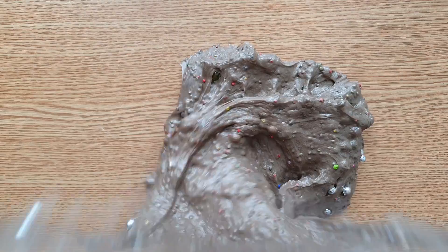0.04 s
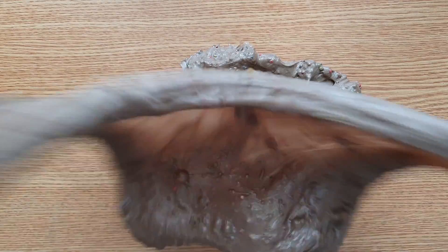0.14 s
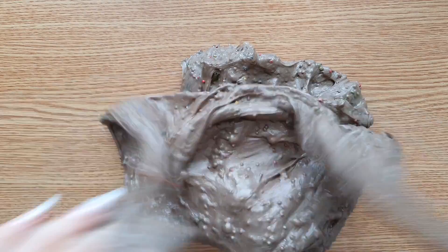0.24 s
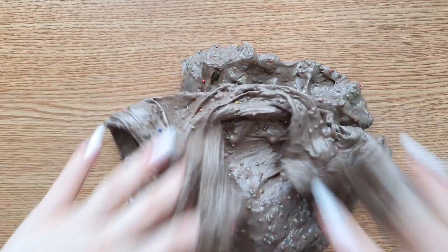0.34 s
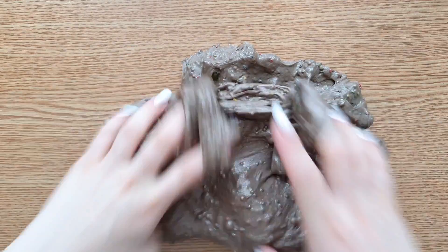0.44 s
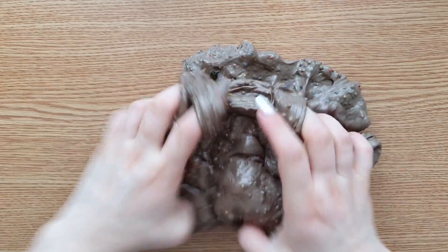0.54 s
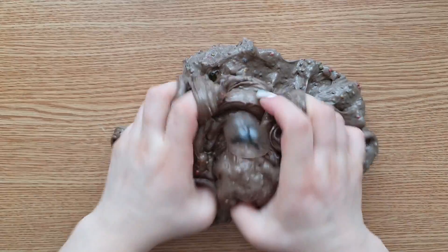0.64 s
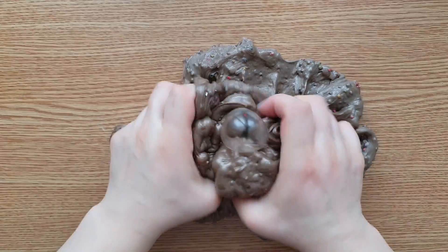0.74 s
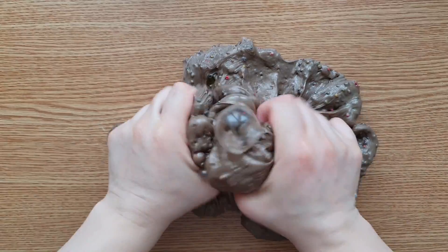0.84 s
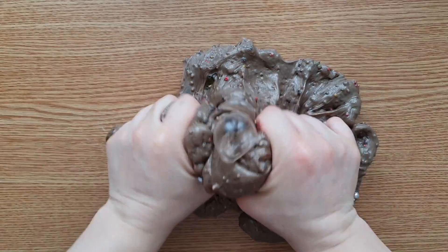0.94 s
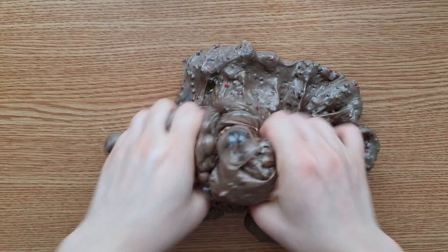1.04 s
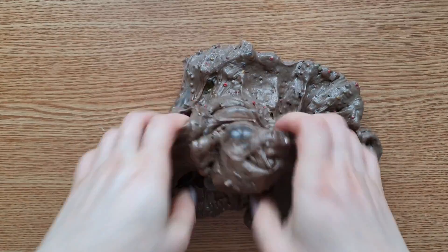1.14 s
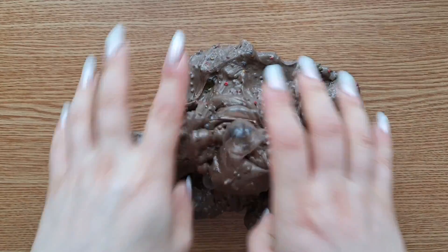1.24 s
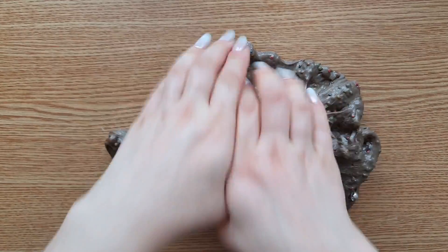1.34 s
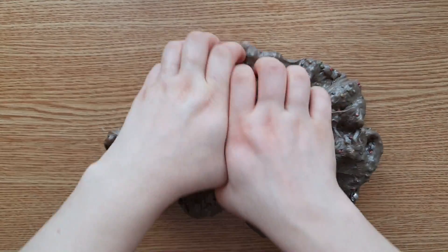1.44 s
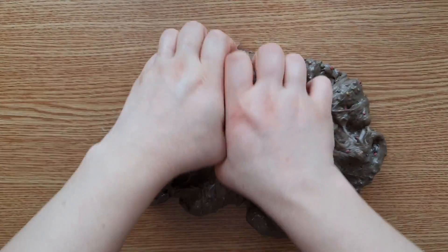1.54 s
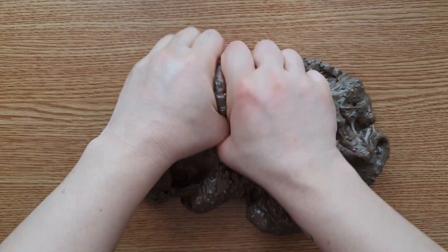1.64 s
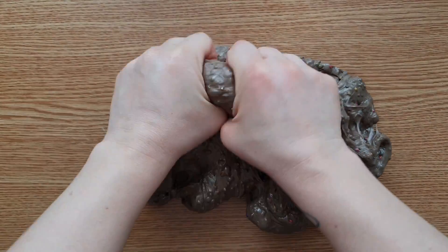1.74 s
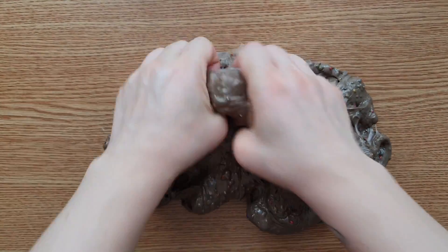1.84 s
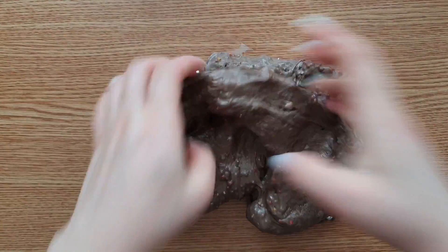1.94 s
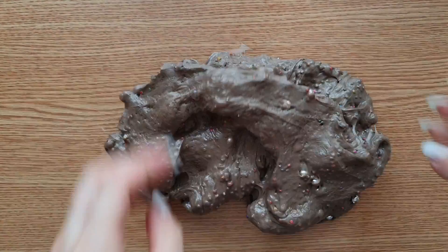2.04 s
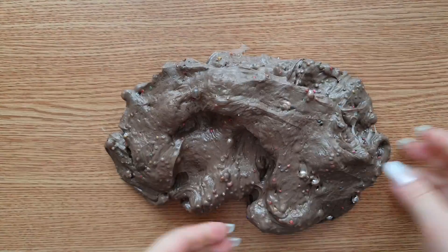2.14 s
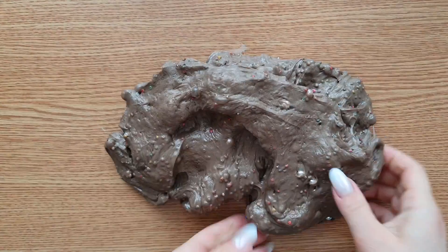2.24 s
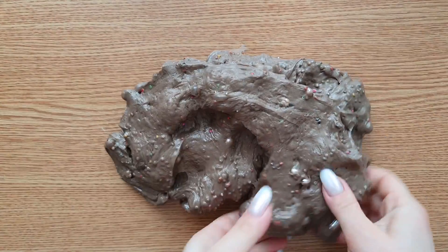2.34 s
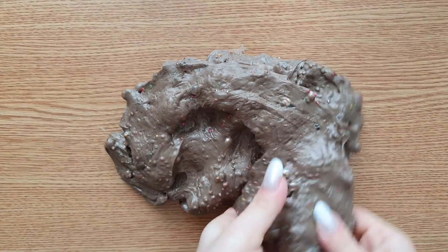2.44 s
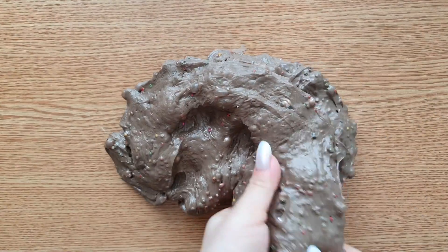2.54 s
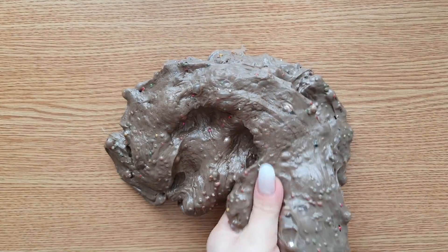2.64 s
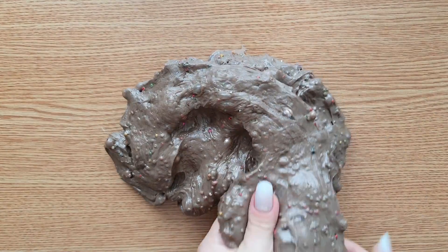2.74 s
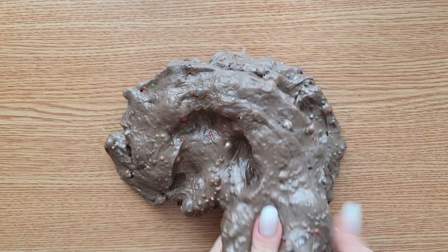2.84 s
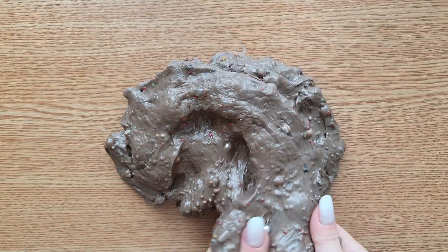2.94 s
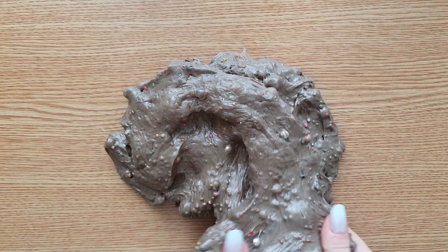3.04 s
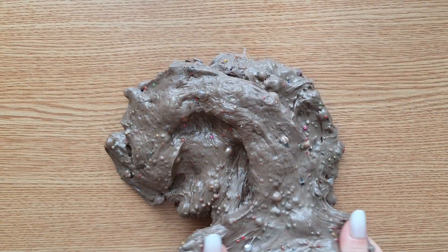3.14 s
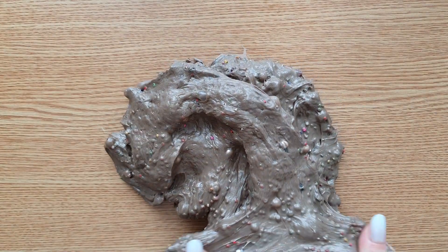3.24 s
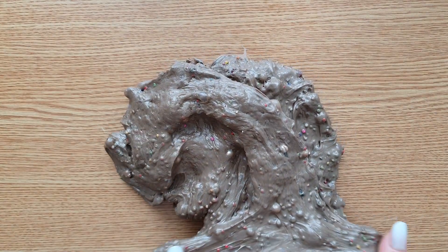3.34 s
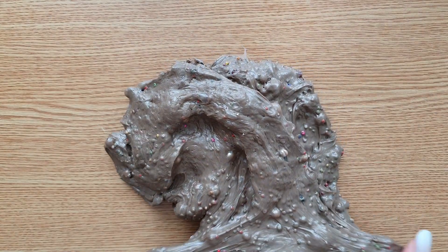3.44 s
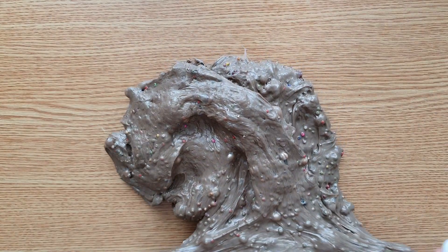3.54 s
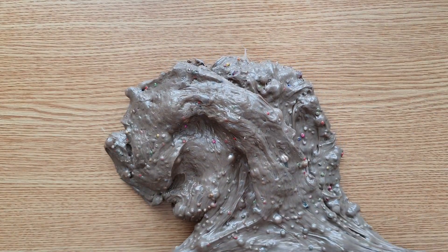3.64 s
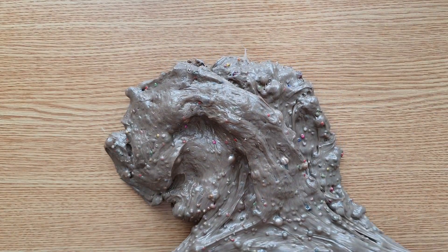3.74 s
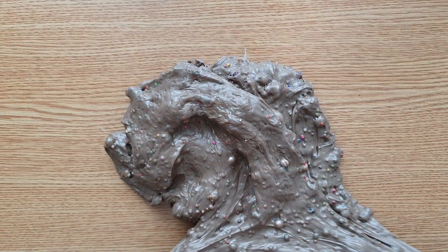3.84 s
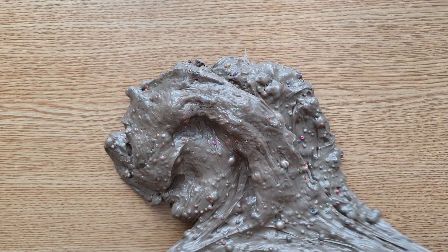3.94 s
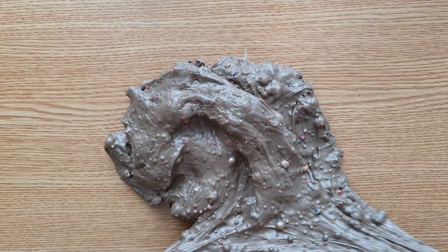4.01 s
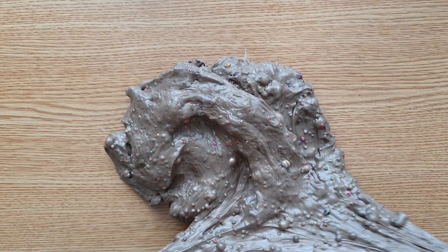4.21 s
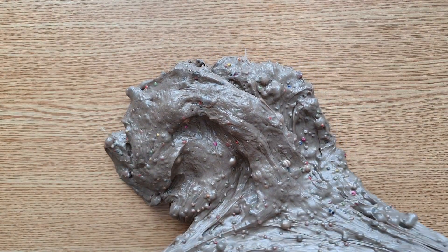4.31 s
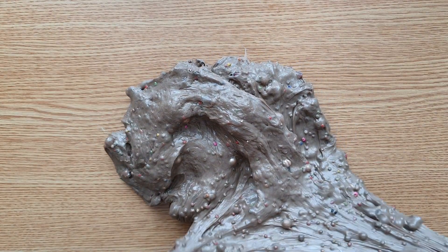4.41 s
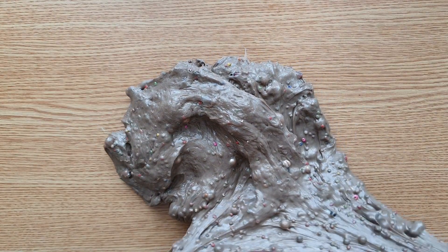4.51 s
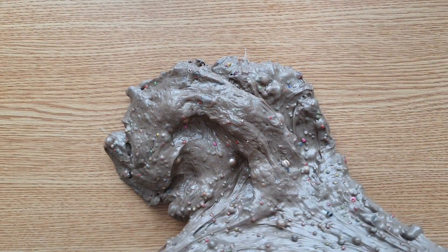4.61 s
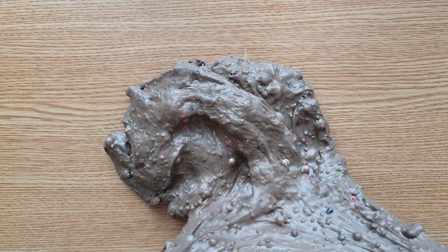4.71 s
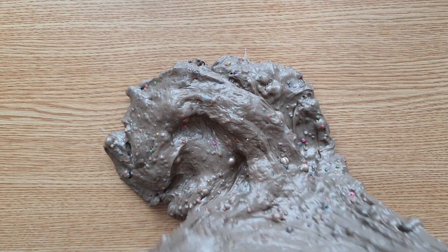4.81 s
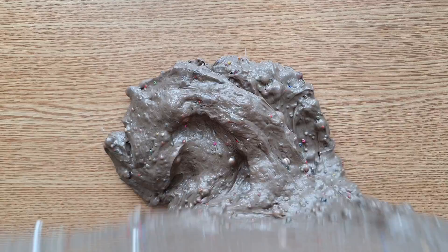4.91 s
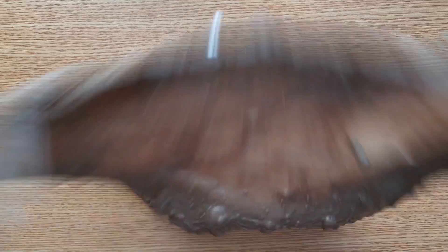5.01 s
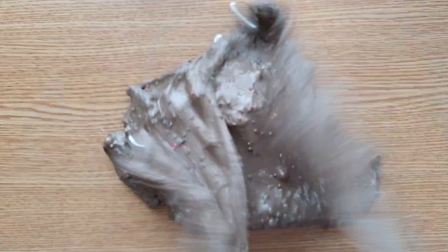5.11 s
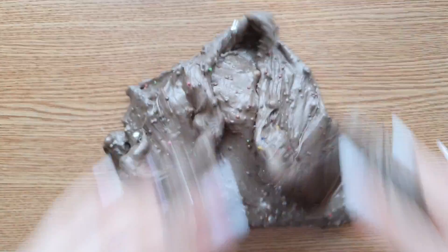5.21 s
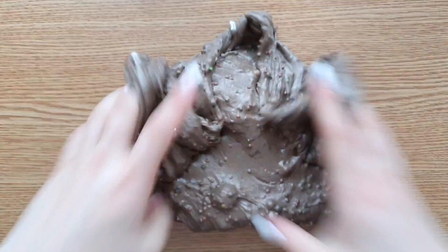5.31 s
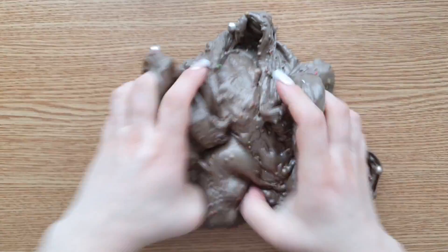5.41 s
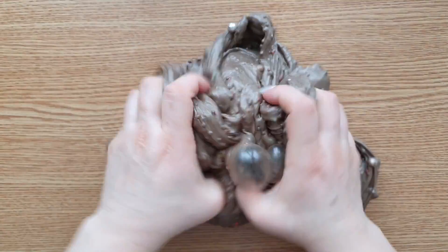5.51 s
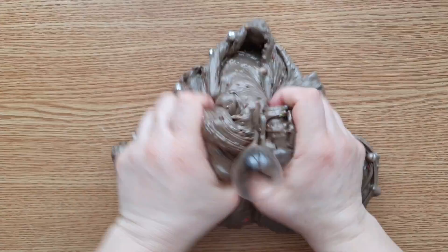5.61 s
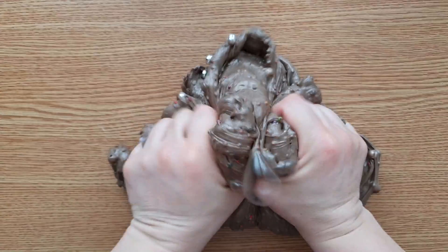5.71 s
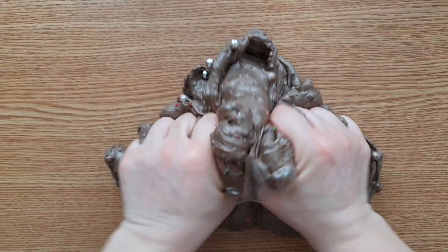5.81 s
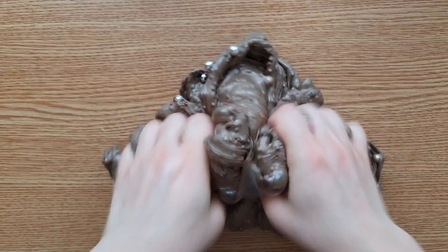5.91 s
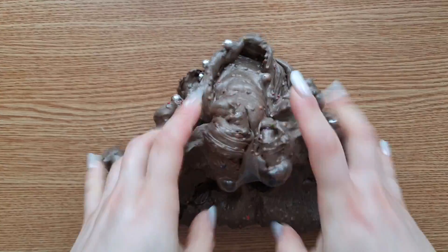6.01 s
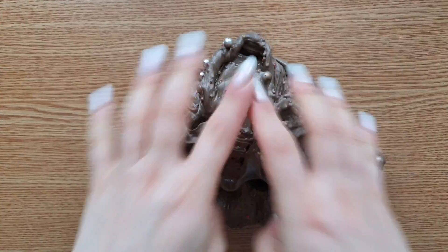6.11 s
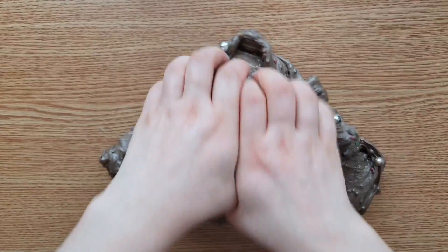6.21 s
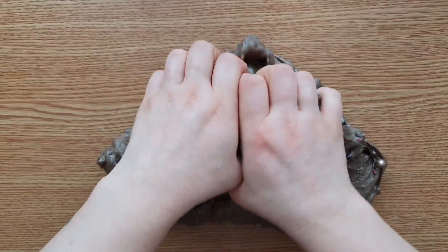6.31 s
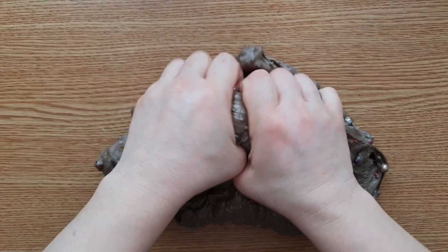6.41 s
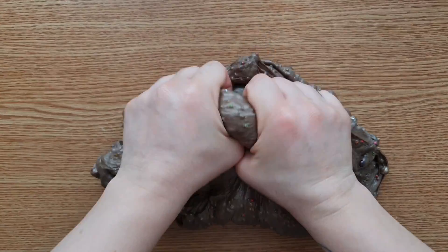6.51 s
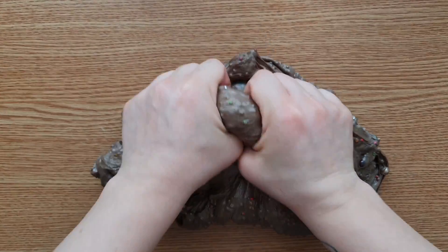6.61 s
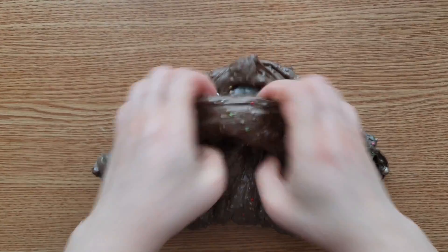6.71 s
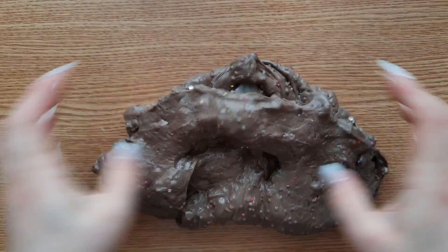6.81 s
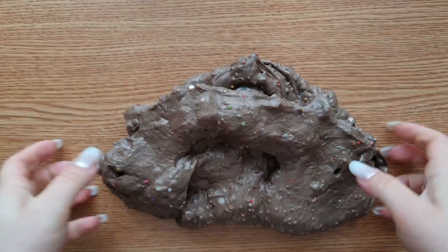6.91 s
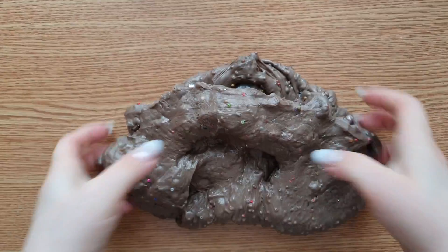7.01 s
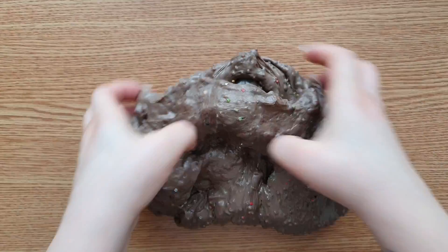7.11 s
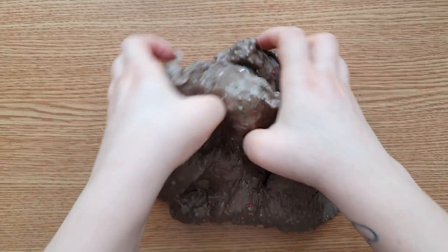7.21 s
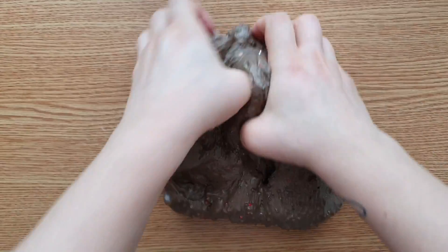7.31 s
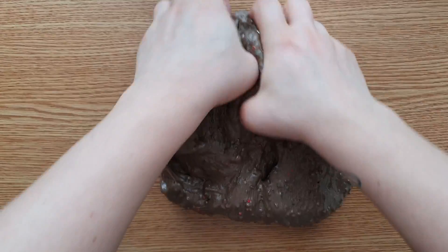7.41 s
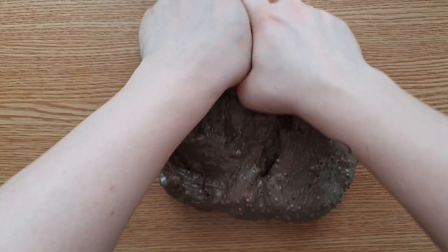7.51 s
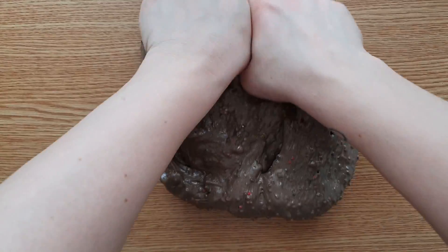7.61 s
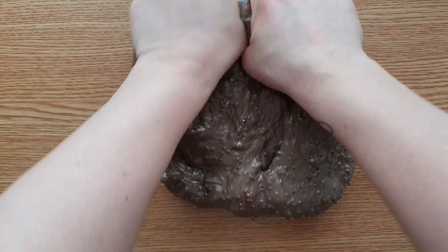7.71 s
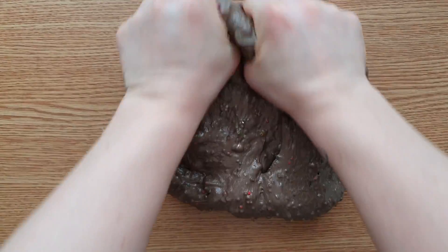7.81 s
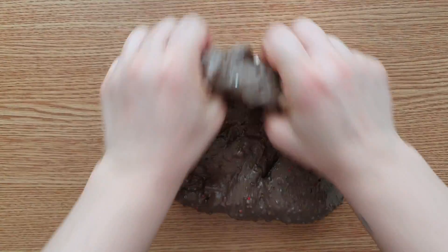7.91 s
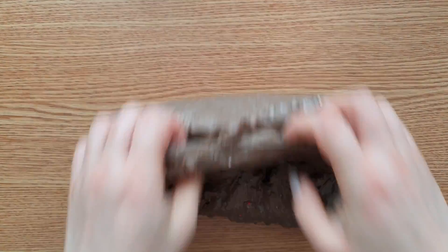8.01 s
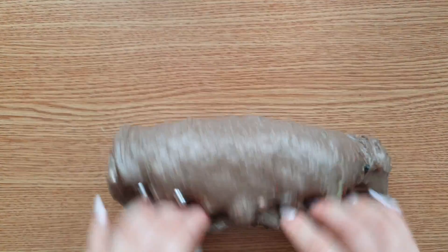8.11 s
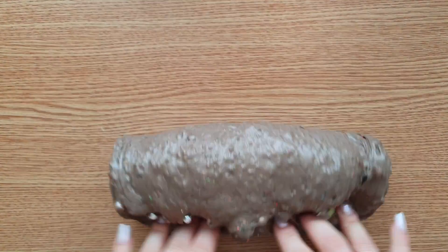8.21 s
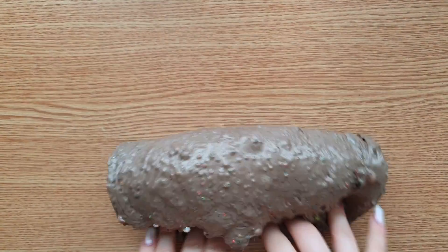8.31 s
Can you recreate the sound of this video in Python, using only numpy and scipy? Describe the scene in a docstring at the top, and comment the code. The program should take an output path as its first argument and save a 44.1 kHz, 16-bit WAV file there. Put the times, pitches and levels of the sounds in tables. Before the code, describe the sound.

Sticky slime is gripped and pressed in quick bursts, its trapped air snapping in dry, bright clicks and wetter pops among squelch and tearing crackle. A quiet pause leaves only faint ticks, hum and room hiss; a low distant motor drone joins midway. Then comes one hard splat and busier kneading to the end. Close stereo microphone, short bright room reflections.

```python
"""Bead-filled slime is slapped, squeezed and peeled by hand on a wooden table in a bare room.
Trapped air pockets burst: a brief sine for the air, noise bursts for the torn skin's splash and spit.
Tearing film, wet squelch and faint ticks are random clicks ringing in hollows; slaps are short noise bursts.
The table top thumps in its modes; echoes and a banded noise tail make the room.
Steady hum and faint whine, a distant motor that sets in midway and room noise lie below."""
import sys
import numpy as np
from scipy import signal
from scipy.fft import rfft, irfft, next_fast_len
from scipy.io import wavfile
from scipy.ndimage import uniform_filter1d

SR = 44100
rng = np.random.default_rng(int(sys.argv[2]) if len(sys.argv) > 2 else 0)


def bounce(signal):
    """Save signal as a 16-bit WAV file at the path given by the first command-line argument."""
    frames = np.transpose(np.atleast_2d(signal))
    limited = np.clip(frames, -1, 1)
    pcm = np.round(limited * 32767).astype(np.int16)
    wavfile.write(sys.argv[1], SR, pcm)


N = 368235

# steady hum and faint whine lines (frequency [Hz], level [dB rms])
HUM_LINES = [(100, -57), (200, -87.5), (300, -81), (689, -82), (996, -80.5), (1270, -79.5)]
# motor drone over time (time [s], level [dB rms])
MOTOR_LEVEL = [(4.36, -65), (4.6, -57), (5.1, -61.5), (6.3, -65), (6.8, -54.5), (7.7, -66), (8.35, -66)]
# room noise spectrum (frequency [Hz], relative density [dB])
ROOM_NOISE_SPECTRUM = [(30, 5.5), (70, -9), (140, 3), (245, -12), (330, -11), (420, -4.5), (600, 8.5),
                       (800, -2), (1350, 4), (2200, -7), (5300, -11.5), (12000, -16), (16000, -23)]
# diffuse sound (frequency [Hz], left-right correlation [0-1])
LIKENESS = [(60, .9), (130, 0.94), (290, 1), (1400, 0.3), (3100, 0.14), (6800, 0.01)]
# table top modes (frequency [Hz], level [dB], t60 [s])
TABLE_MODES = [(44, -11.5, 0.84), (70, -2, 0.75), (124, 4, 0.25), (210, -4.5, 0.27), (261.5, -2, .3),
               (530, -14.5, .15)]
# room decay (frequency [Hz], t60 [s])
ROOM_T60 = [(200, 0.064), (530, 0.15), (1400, 0.4), (3700, 0.35), (9700, 0.45), (15000, 0.24)]
# diffuse tail (frequency [Hz], reflected against direct energy [dB])
ROOM_TAIL = [(200, -4.5), (1000, -5), (3500, -5.5), (8000, -8), (15000, -13)]
# nearby surfaces (delay [ms], level [dB])
ECHOES = [(1.1, -26), (2.6, -33), (4.1, -13.5), (7.6, -15.5), (11.5, -17)]
# grips, squeezes and peels (start [s], hold [s], tearing film [dB], squelch [dB], push on the table [dB])
GRIPS = [(0.181, 0.085, -42, -78, -75), (0.453, 0.13, -64, -68, -66), (0.6, 0.25, -48, -64, -59.5),
         (0.864, 0.092, -48.5, -58, -70), (1.034, .12, -43.5, -49, -50), (1.433, 0.078, -59, -48.5, -64),
         (1.571, .14, -36, -50, -72), (1.811, 0.12, -47, -54, -59), (2.172, 0.083, -48.5, -61, -58),
         (2.334, 0.16, -54.5, -57, -66), (2.513, 0.33, -63.5, -75, -75), (4.373, .24, -64, -76, -69),
         (4.696, 0.086, -68.5, -74, -71), (4.92, 0.068, -67, -71, -68), (5.101, 0.14, -42.5, -59, -48),
         (5.334, 0.057, -60, -47.5, -50), (5.452, 0.29, -49, -60, -57), (5.683, 0.11, -48.5, -45, -53),
         (5.871, 0.12, -41, -45.5, -50), (6.389, 0.16, -39, -43.5, -72), (6.653, 0.089, -43.5, -47.5, -48),
         (6.893, 0.078, -51, -56.5, -54), (7.084, 0.29, -51, -68, -65), (7.45, 0.33, -48.5, -66, -66),
         (7.862, 0.11, -41.5, -52, -59), (7.991, 0.088, -48, -49.5, -66), (8.11, 0.062, -64, -59, -53),
         (8.252, 0.06, -43, -48.5, -72)]
# restless lump between grips: (tearing film [dB], squelch [dB], push [dB])
CREEP_DB = (-73, -70.5, -73.5)
# small hollows in the film (frequency [Hz], relative level [dB])
FILM_HOLLOWS = [(900, -18), (1800, -8.5), (3200, 0.5), (4500, 0.5), (7000, 0), (11000, -10), (15000, -25)]
# larger, wet hollows (frequency [Hz], relative level [dB])
SQUELCH_HOLLOWS = [(210, 8.5), (270, 6.5), (430, 11.5), (540, 4.5), (640, 4.5), (950, 1)]
# hollows of the faint ticks (frequency [Hz], relative level [dB])
TICK_HOLLOWS = [(3000, -15), (6000, -2), (10000, 1), (15000, -2.5)]
# slime slapped on the table (time [s], peak [dB], splat decay constant [ms], table thump [dB])
SLAPS = [(0.182, -5.5, 5.3, -53.5), (5.0943, 1.5, 4, -34)]
# splat spectrum (frequency [Hz], relative density [dB])
SPLAT_SPECTRUM = [(180, -39), (300, -22), (418, -32), (574, -15), (1390, -8), (1840, -1.5), (3520, -4.5),
                  (3890, 1.5), (5430, -10), (5800, -5.5), (6300, -6.5), (10900, -11), (16000, -20.5)]
# clearest bursting air pockets (time [s], peak [dB], pocket [Hz], nominal length [ms],
# bright spit share [dB], send to the room [dB])
POPS = [(0.1077, -22, 7300, 3.6, 6, 2), (0.183, -26.5, 614, 13, -30.0, 4),
        (0.184, -22.5, 980, 6.4, -30.0, 3), (0.4452, -21.0, 3800, 1.4, -8, -2.0),
        (0.506, -33, 4160, 1.6, 2, 7), (0.5175, -28, 3300, 2.2, -17.0, -4),
        (0.5254, -32.0, 6330.0, 2.8, 1, 7), (0.5493, -18, 11700, 0.52, -7, 4),
        (0.597, -29, 8550.0, 1.6, -10.0, -4.0), (0.6042, -19.5, 1620, 2.8, -29, 0.5),
        (0.6059, -27.5, 494.0, 8.2, -30.0, -2.5), (0.659, -17, 3920.0, 3, -9.5, 0.5),
        (0.6987, -25.0, 3270.0, 3.5, -1, 8), (0.704, -20.5, 1780, 1.7, -12, -5),
        (0.7143, -26, 3400.0, 2.8, -8.0, -5), (0.7516, -22, 6740.0, 2.4, 16, -11),
        (0.7614, -23.5, 3340.0, 2.5, -22, 0), (0.7705, -28, 1320.0, 3.3, -30.0, 0),
        (0.7796, -15.5, 9320.0, 1.1, 0, -4.5), (0.7982, -29, 3560.0, 3.3, -23.0, -5),
        (0.809, -16.0, 4440.0, 3.6, -10, 1), (0.8127, -19, 3290.0, 2.1, -4, 2),
        (0.8345, -8, 5450, 1.7, -14, 1.5), (0.8662, 2, 4550, 1.8, -8, 2),
        (0.873, -19.5, 5050.0, 11, 15, 14.5), (0.883, -17.0, 1240, 2.2, -2, -11),
        (0.9149, -3, 4200, 1.4, -13.5, 3.5), (1.073, -29.5, 484, 8.0, -30.0, -3),
        (1.14, -18.5, 8600, 4.3, 0, 2.5), (1.156, -26.5, 3490.0, 3.6, 0, -10),
        (1.3508, -36, 3080, 1, -1, 7.0), (1.372, -32, 3670, 0.72, -11, 5),
        (1.4308, -14, 2420, 5.2, -15, 1.5), (1.4604, -16, 6300, 4.6, -3.5, 9),
        (1.4659, -23, 450, 3.5, -21.0, 0.0), (1.5092, -5, 2080, 0.69, -10.5, -2.5),
        (1.549, 1, 3270.0, 1.3, -25, -8), (1.553, 2.5, 4430, 0.57, -26, 0),
        (1.5857, -0.5, 2760, 4, -4, -1.5), (1.5986, -1.5, 4500, 2, -11, 7.5),
        (1.606, -17, 3240, 1.9, -15.0, -16), (1.621, -15, 3980.0, 2.0, 1, -9),
        (1.6376, -7, 3360.0, 0.55, -9, -4), (1.64, -14, 9400.0, 4, 14, -3),
        (1.6603, -12.5, 1310, 12, -3, -11), (1.686, -7, 10200, 3.5, 15, 1),
        (1.7134, 4, 10400.0, 0.39, 30, 3.5), (1.8467, -25, 3150, 10, -12.0, 12),
        (1.868, -14.5, 3460, 7, -13, 4), (1.919, -21.5, 393, 0.84, -5.5, 0),
        (2.127, -31, 3630, 3.6, -6, 12.5), (2.1711, -28.5, 2440, 5.7, -22, 12),
        (2.2043, -21, 2700, 4.6, -5.5, -2), (2.306, -30.5, 1930, 1.9, -26, 6),
        (2.3483, -32.0, 1810.0, 2, -21.0, 3), (2.3786, -24.5, 2130, 2.1, -30.0, 4.5),
        (2.4402, -31.0, 990, 2.9, -1, 7), (2.555, -23.5, 2510, 2.9, -30, 1),
        (2.6874, -21, 4570.0, 1.9, 2, 2.5), (2.7451, -28.5, 2150, 4, -5, 2.5),
        (2.7737, -31, 2050, 1.8, -13, -3.0), (3.0518, -35.5, 1920.0, 1.8, -1.5, 3),
        (3.1228, -30, 11930.0, 0.46, -11.0, 6), (3.2551, -39.0, 1380.0, 2.4, 2, -3),
        (4.3474, -42, 11330.0, 3, 7, 9.5), (4.4892, -25.5, 4350, 1.6, -0.5, -3.5),
        (4.9117, -29, 7300, 2.2, -19, 4), (5.081, -28.5, 860.0, 7.5, -36.0, 6.5),
        (5.2902, -28.0, 1920, 4.7, -26.5, 6.5), (5.353, -18, 3370.0, 0.44, -9.5, 13),
        (5.401, -15, 6170, 1.8, -8, 5), (5.4686, -9.5, 12900, 1.0, -17, -3.0),
        (5.4785, -21.5, 4440, 2.3, -15, 3), (5.4942, -24, 920.0, 1.8, -5, 0),
        (5.5382, -18.5, 7140, 2.5, -6.5, 1), (5.5617, -20, 6520.0, 1.6, -6, 15),
        (5.5692, -23, 2710.0, 1.5, -30.0, 6), (5.5751, -1.5, 3820.0, 4.7, -30.0, -6.5),
        (5.5772, -22, 507, 4, -28.0, -1), (5.599, -14.5, 2920, 3.3, -19, -15),
        (5.616, -17, 3300, 1.2, 6, 5), (5.6249, 0, 7270, 0.29, -17, 10),
        (5.676, -9.0, 420, 6.2, -14.5, -0.5), (5.6773, -8.5, 3800, 4, -11, -1),
        (5.7349, -22, 2660.0, 3, 8.0, 0.0), (5.7679, -17.0, 1280, 3.6, -25, -9),
        (5.7714, -14.5, 2760, 8.6, -30.0, -6.5), (5.865, -15, 3870, 2.3, -29.0, 2.5),
        (6.0044, -16, 11700, 1.1, -11.0, -14.0), (6.202, -35.5, 3830.0, 2.7, -12, 3),
        (6.2144, -32.5, 2500, 3.3, -6.0, 6), (6.2615, -20, 2550, 1.2, -14, -1),
        (6.301, -30, 3160.0, 1.8, -14, 13), (6.3099, -4, 2800, 0.49, -23, -3.0),
        (6.3325, -1.5, 1930, 3.9, -47, -2.5), (6.3556, 2.5, 3180, 4.9, -19.0, -5.0),
        (6.391, -27, 7000.0, 1.5, 7, -7), (6.4029, -26, 4570.0, 2.4, -19, 0),
        (6.4176, 0.5, 6400, 3.3, -8.5, 2.5), (6.432, -4, 2540.0, 1.9, -2.0, -1.5),
        (6.4731, 2, 3850.0, 0.3, -12, 3), (6.4832, -4.5, 5100, 5.1, -2, -11),
        (6.4938, -5.5, 6280, 1.8, -1, 3), (6.652, -18, 3600.0, 3.5, -27.0, 5),
        (6.67, -23.5, 2740, 8.2, -7.0, 8), (6.721, -21, 2770, 3.8, -3.5, -17),
        (6.8749, -26.5, 3460, 1.9, -30, 16), (6.88, -22.0, 1870, 3.4, -4.5, 1),
        (6.897, -10, 3900, 8.6, -13.5, 1.5), (7.0276, -31, 1990.0, 1.2, -26.0, 7),
        (7.0495, -22, 3160, 0.6, -37.0, 7.5), (7.0538, -22, 2720, 2.3, -29, 1),
        (7.1702, -28, 3400, 1.9, -28, -5), (7.221, -7.5, 3650.0, 1.1, 3.5, -3.5),
        (7.282, -9.5, 3470, 3.3, -16.0, -2), (7.3631, -26.0, 2900, 2.8, -3, 3),
        (7.3849, -26, 4000.0, 2.6, -21.0, -8.0), (7.4175, -11.5, 3620, 4.6, -7.5, -1),
        (7.428, -14.5, 1750, 6.3, -5, -0.5), (7.502, 4, 6740, 3, -12, -2.0),
        (7.5738, -16, 6500.0, 1.6, 10, 1), (7.5919, -17, 4060, 2.9, -18.0, -5),
        (7.6341, -26.5, 426, 1.5, -2.0, -1), (7.667, -1, 2670, 1.3, -24, -1.5),
        (7.673, -27, 5540.0, 4.5, -6, -5), (7.7113, -11, 3400, 1.3, -2, 3),
        (7.7371, -8, 3470, 0.77, -1.5, 4), (7.932, -15, 3500, 7.5, -18.0, -10),
        (8.0815, -27.5, 5510.0, 3.3, -1, 7), (8.1593, -33.0, 5630, 1.9, 11, 8),
        (8.2227, -31, 4940, 1.5, 3, -5), (8.2331, -28.5, 573, 14, -32, 7.5),
        (8.2559, -5, 4120, 1.9, -8.5, -6.5), (8.2594, -11, 6600.0, 4.6, -14.0, 0),
        (8.312, -22.5, 6100, 4.5, -6, 1)]

ROOM_NOISE_DB, MOTOR_HZ = -60, 44.4
GRIP_ATTACK_S, GRIP_RELEASE_S = 0.049, 0.01
SMALL_POPS_DB = -9   # against the film
TICKS_DB = -75
DULL_DB, DULL_DB_PER_DB, DULL_SPREAD_DB = -13.5, -0.37, 4   # dull splash share at 0 dB peak; weaker pops are wetter
DULL_HZ, DULL_DB_PER_OCTAVE = 2200, -4   # very small and very large pockets splash less
LONG_MS, CYCLES_PER_MS = 5.4, 0.26   # longer pockets ring on, a clearer note
PAN_DB, PAN_SPREAD_DB = 1.5, 1.5   # pockets lie scattered, a little to the left
LEFT_DB = 1   # left over right
STOPBAND_HZ = 16800


def amp(db):
    """Gain of a level in dB."""
    return 10 ** (np.asarray(db, float) / 20)


def rms_one(x):
    """Each row scaled to rms 1."""
    return x / np.sqrt(np.mean(x ** 2, axis=-1, keepdims=True) + 1e-20)


def at_hz(points, hz):
    """Table read on a log-frequency axis."""
    table_hz, values = np.transpose(points)
    return np.interp(np.log(np.maximum(hz, 1)), np.log(table_hz), values)


def band(x, low_hz, high_hz):
    """Band-pass along the last axis."""
    return signal.sosfilt(signal.butter(2, [low_hz, high_hz], "band", fs=SR, output="sos"), x)


def ring(clicks, hz, t60_s):
    """Two-pole resonator: a unit click starts a decaying sine of height 1."""
    r, w = amp(-60 / (t60_s * SR)), 2 * np.pi * hz / SR
    return signal.lfilter([0, np.sin(w)], [1, -2 * r * np.cos(w), r * r], clicks + 1e-18)


def drift(rate_hz):
    """Slow random curve of spread 1, computed every 40 samples."""
    r = np.exp(-80 * np.pi * rate_hz / SR)
    slow = signal.lfilter([1], [1, -2 * r, r * r], rng.standard_normal(N // 40 + 2002))[2000:]
    return np.interp(np.arange(N) / 40, np.arange(len(slow)), rms_one(slow - slow.mean()))


def diffuse(size, spectrum):
    """Coloured stereo noise whose channels part toward the treble."""
    hz = np.arange(size // 2 + 1) * SR / size
    mid, side = rfft(rng.standard_normal((2, size)))
    alike = np.clip(at_hz(LIKENESS, hz), 0, 1)
    stereo = np.sqrt(1 + alike) * mid + np.sqrt(1 - alike) * side * [[1], [-1]]
    return irfft(amp(at_hz(spectrum, hz)) * stereo, size)


def evened(x):
    """Bursts with the chance peaks of their spectrum flattened."""
    spectrum = rfft(x)
    power = uniform_filter1d(np.abs(spectrum) ** 2, size=9)
    return irfft(spectrum / np.sqrt(power + 1e-12), x.shape[-1])


def add(out, times_s, sounds):
    """Mixes stereo sounds (events x 2 x samples) in at their times."""
    for at, sound in zip(np.round(np.asarray(times_s) * SR).astype(int), sounds):
        out[:, at:at + sound.shape[1]] += sound[:, :N - at]


def room_noise():
    """Steady diffuse coloured noise."""
    return amp(ROOM_NOISE_DB) * rms_one(diffuse(next_fast_len(N), ROOM_NOISE_SPECTRUM)[:, :N])


def hum_and_motor():
    """Steady hum and faint whine lines that waver a little, and a low unsteady drone that starts midway."""
    t = np.arange(N) / SR
    lines = sum(amp(level_db + 0.98 * drift(3.2)) * np.sin(2 * np.pi * hz * t) for hz, level_db in HUM_LINES)
    motor_amp = amp(np.interp(t, *np.transpose(MOTOR_LEVEL)) + 3.9 * drift(3.8))
    motor_phase = 2 * np.pi * np.cumsum(MOTOR_HZ + 2.7 * drift(2.1)) / SR
    onset = np.clip((t - MOTOR_LEVEL[0][0] + .06) / 0.073, 0, 1)
    both = lines + motor_amp * np.sin(motor_phase) * onset
    return np.sqrt(2) * np.array([both, np.roll(both, 30)])   # right lags 30 samples


def reflections(turn):
    """Impulse response: a few early echoes and a diffuse tail that dies band by band."""
    size = SR // 2
    t, tail = np.arange(size) / SR, 0
    noise = [diffuse(size, ROOM_TAIL), diffuse(size, ROOM_TAIL)]   # neighbouring bands get unrelated noise
    edges_hz = 100 * 2 ** np.arange(0, 7.6, .75)
    for k, (low_hz, high_hz) in enumerate(zip(edges_hz, edges_hz[1:])):
        t60_s = at_hz(ROOM_T60, np.sqrt(low_hz * high_hz))
        unit_energy = np.sqrt(t60_s * SR / (6 * np.log(10)))
        tail = tail + band(noise[k % 2], low_hz, high_hz) * amp(-60 * t / t60_s) / unit_energy
    tail = tail * (1 - np.exp(-t / 0.0024))
    for k, (ms, level_db) in enumerate(ECHOES):
        shift = np.array([3 * turn, (3, -4, 6, -2)[(k + turn) % 4]])   # samples, left and right
        tail[[0, 1], round(ms * SR / 1000) + shift] += amp(level_db)
    return tail


def room(x, count):
    """The sound is dealt at random, in short stretches, to several room responses."""
    dealt = rng.integers(0, count, N // 1500 + 1).repeat(1500)[:N]
    mono = x.mean(axis=0, keepdims=True)
    return sum(signal.fftconvolve(mono * (dealt == k), reflections(turn=k), axes=1)[:, :N] for k in range(count))


def hands():
    """Every grip swells, holds and dies away; gains of film, squelch and push."""
    start_s, hold_s, *levels_db = np.array(GRIPS).T
    t = np.arange(0, N + 64, 64) / SR - start_s[:, None]
    swell = np.clip(1 + t / GRIP_ATTACK_S, 0, 1) ** 2   # full at the start time
    release = np.exp(-np.maximum(t - hold_s[:, None], 0) / GRIP_RELEASE_S)
    gains = amp(levels_db) @ (swell * release) + amp(CREEP_DB)[:, None]
    return [np.interp(np.arange(N) / 64, np.arange(len(g)), g) for g in gains]


def table(push):
    """Kneading shakes the top with noise, slaps strike it; both ring in its modes."""
    blows = np.zeros(N)
    for s, _, _, thump_db in SLAPS:
        blows[round((s + .004) * SR)] = amp(thump_db)
    shake = rng.standard_normal(N) * push * amp(-35.0)
    thump = sum(amp(level_db) * ring(blows + shake, hz, t60_s) for hz, level_db, t60_s in TABLE_MODES)
    return np.array([thump, np.roll(thump, 30)])


def grains(per_s, hollows, cycles, spread_db, count):
    """Random clicks, each ringing a few cycles (to -60 dB) in a hollow of its own size and place."""
    sizes = amp(spread_db * np.minimum(rng.exponential(1, N), 4)) * rng.choice([-1, 1], N)
    clicks = sizes * (rng.random(N) < per_s / SR)
    dealt, out = rng.integers(0, count, N), np.zeros((2, N))
    for k, hz in enumerate(np.geomspace(hollows[0][0], hollows[-1][0], count)):
        rung = rms_one(ring(clicks * (dealt == k), hz, cycles / hz))
        sound = amp(at_hz(hollows, hz)) * np.sqrt(hz) * rung
        out += [sound, np.roll(sound, (1.5, -4.0, 13.5, -3.5)[k % 4])]
    return rms_one(out)


def ticks():
    """Sparse faint ticks from the resting lump."""
    return amp(TICKS_DB) * grains(30, TICK_HOLLOWS, cycles=2.0, spread_db=2.5, count=8)


def squelch(squelching):
    """Wet grains in larger hollows, following the grips."""
    return squelching * grains(1200, SQUELCH_HOLLOWS, cycles=7.0, spread_db=2.5, count=10)


def tearing_film(tearing):
    """Dense flickering crackle and many small pops, following the grips."""
    film = amp(2.5 * drift(30)) * grains(7000, FILM_HOLLOWS, cycles=4.0, spread_db=3.8, count=16)
    small = amp(SMALL_POPS_DB) * grains(120, FILM_HOLLOWS, cycles=2.5, spread_db=3.5, count=8)
    return tearing * (film + small)


def slaps():
    """Broad wet contact: an evened noise burst a few ms long, coloured by the splat spectrum."""
    s, peak_db, decay_ms, _ = np.array(SLAPS).T[:, :, None, None]
    t_ms = np.arange(2048) / SR * 1000
    noise = np.array([diffuse(size=2048, spectrum=SPLAT_SPECTRUM) for _ in SLAPS])
    burst = evened(noise * (1 - np.exp(-t_ms / 0.33)) * np.exp(-t_ms / decay_ms))
    splat = irfft(rfft(burst) * amp(at_hz(SPLAT_SPECTRUM, np.arange(1025) * SR / 2048)))
    out = np.zeros((2, N))
    add(out, s.ravel(), amp(peak_db) * splat / np.abs(splat).max(axis=(1, 2), keepdims=True))
    return out


def pops(cycles, ring_share, snap, lag_ms):
    """A pocket rings briefly; its torn skin adds a dull splash and bright spit. Returns direct, room send."""
    s, peak_db, hz, nominal_ms, bright_db, escape_db = np.array(POPS).T[:, :, None, None]
    chance = rng.standard_normal((len(POPS), 4, 700))
    dull_chance, pan_chance, lag_chance = chance[:, 3:, 1:2], chance[:, 3:, 2:3], chance[:, 3:, :1]
    length_ms = ring_share * nominal_ms

    dull_db = DULL_DB + DULL_DB_PER_DB * peak_db + DULL_SPREAD_DB * dull_chance
    dull_db = dull_db + DULL_DB_PER_OCTAVE * np.abs(np.log2(hz / DULL_HZ))
    pan_db = PAN_DB + PAN_SPREAD_DB * pan_chance
    lag = lag_ms * lag_chance * [[.5], [-.5]]   # each pocket reaches one channel a little sooner
    t_ms = np.maximum(np.arange(700) / SR * 1000 - .15 - np.clip(lag, -.14, .14), 0)

    # the skin gives way gradually
    longest_cycles = cycles + CYCLES_PER_MS * np.maximum(nominal_ms - LONG_MS, 0)
    crest_ms = np.clip(length_ms / 2, 400 / hz, 1000 * longest_cycles / hz)
    swell = (t_ms * np.exp(-t_ms / crest_ms)) ** 2
    pocket = rms_one(swell * np.sin(2 * np.pi * hz * t_ms / 1000))

    fade = (t_ms > 0) * amp(-10 * t_ms / length_ms)
    tear = snap * (t_ms > 0) * np.exp(-t_ms / 0.01)
    dull = rms_one(band(evened(tear + fade * chance[:, :1]), 320, 4800))
    bright = rms_one(band(evened(tear + fade * chance[:, 1:3]), 4800, 13000))
    pocket_share = np.sqrt(np.clip(1 - amp(2 * dull_db) - amp(2 * bright_db), .15, 1))
    sound = pocket_share * pocket + amp(dull_db) * dull + amp(bright_db) * bright
    sound = amp(peak_db) * sound / np.abs(sound).max(axis=(1, 2), keepdims=True)

    direct, escaped = np.zeros((2, 2, N))
    add(direct, s.ravel(), sound * amp(pan_db * [[.5], [-.5]]))
    add(escaped, s.ravel(), sound * amp(escape_db))   # escapes the hands to the room
    return direct, escaped


def scene():
    """Slime in the room and table thumps over the background; left slightly louder."""
    tearing, squelching, pushing = hands()
    direct, escaped = pops(cycles=1.0, ring_share=.55, snap=2.5, lag_ms=.075)
    wet = slaps() + tearing_film(tearing) + squelch(squelching) + ticks()
    slime = band(direct + wet + room(escaped + wet, count=3), 130, 19500)
    background = room_noise() + hum_and_motor()
    return (slime + table(pushing) + background) * amp([[LEFT_DB / 2], [-LEFT_DB / 2]])


def record(dry):
    """Loud peaks are rounded, the top is cut, full scale clips."""
    rounded = 1.1 * np.tanh(dry / 1.1)
    low_pass = signal.cheby2(14, 80, STOPBAND_HZ, fs=SR, output="sos")
    return np.clip(signal.sosfilt(low_pass, rounded), -1, 1)


dry = scene()
out = record(dry)
bounce(out)
```